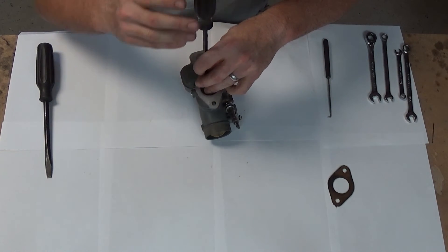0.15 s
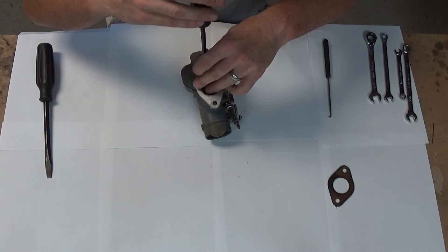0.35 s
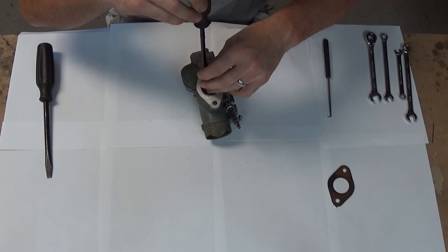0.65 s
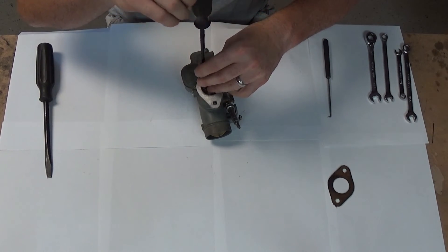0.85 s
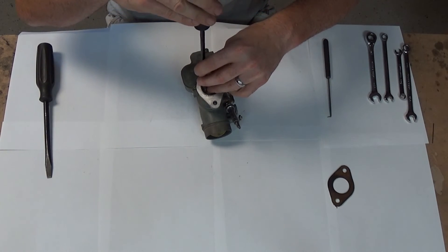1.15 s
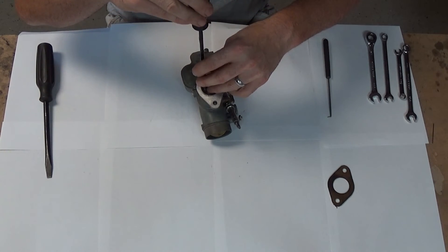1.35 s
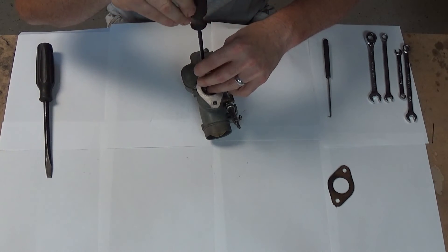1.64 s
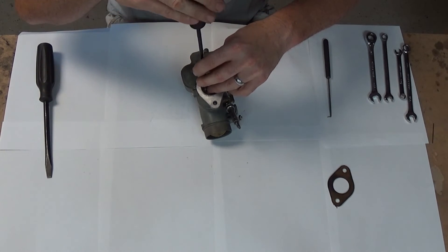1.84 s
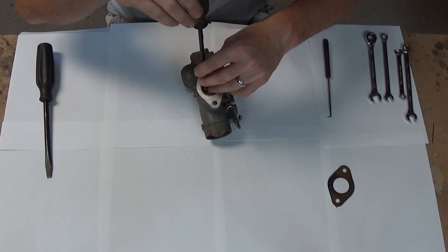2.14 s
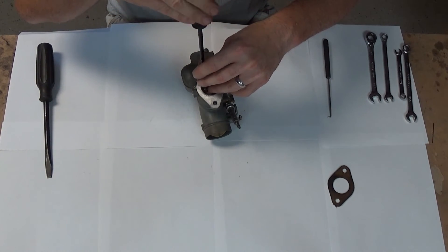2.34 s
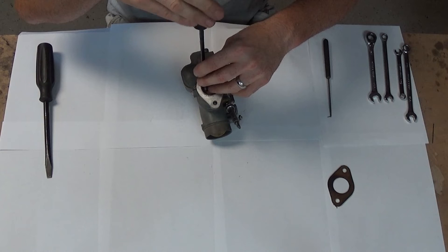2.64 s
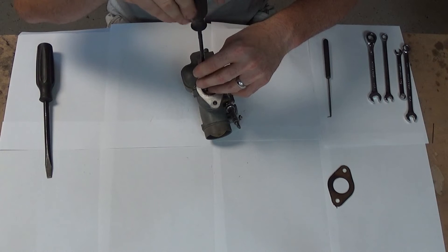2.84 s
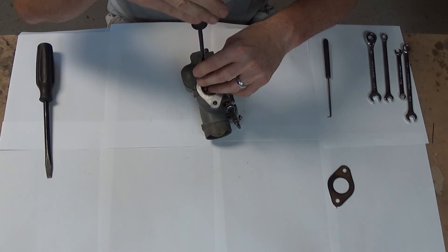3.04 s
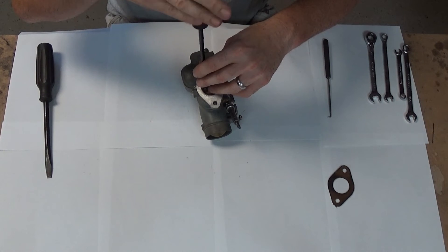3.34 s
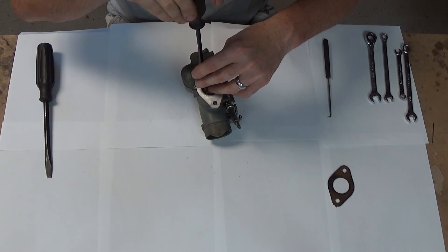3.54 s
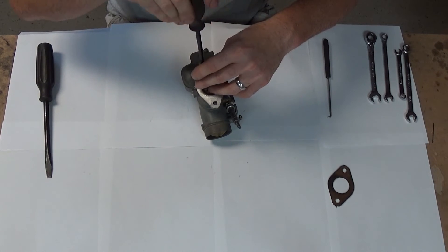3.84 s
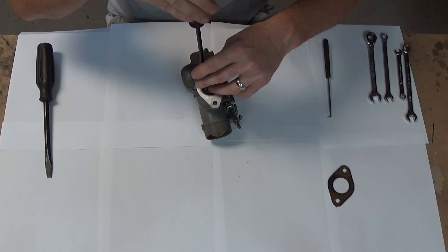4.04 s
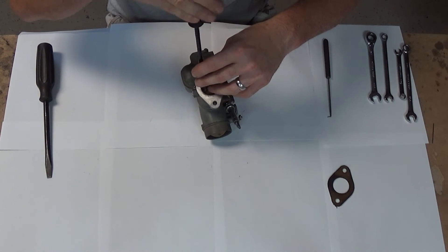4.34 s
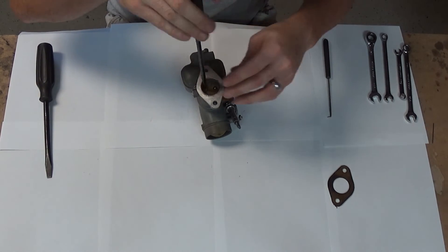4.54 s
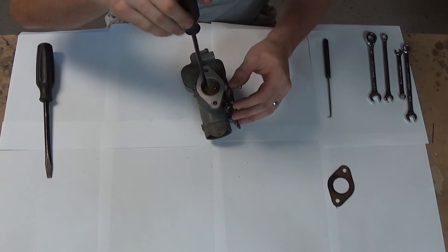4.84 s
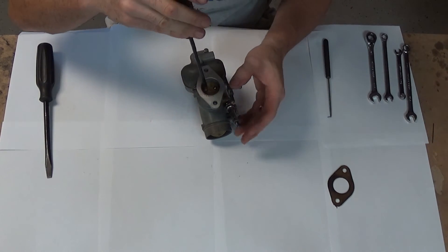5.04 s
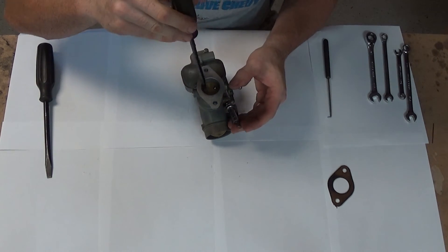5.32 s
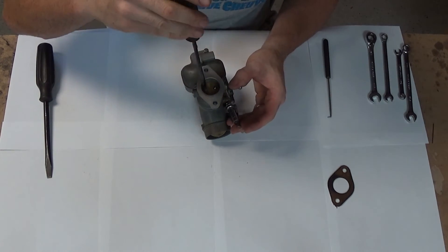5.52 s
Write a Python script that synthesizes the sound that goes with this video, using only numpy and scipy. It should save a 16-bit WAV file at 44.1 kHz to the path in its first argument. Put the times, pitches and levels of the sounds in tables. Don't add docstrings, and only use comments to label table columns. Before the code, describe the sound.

A screwdriver clacks, ticks and rings on a small metal casting over a bench, with one hard snap near the end and a faint hum.

```python
import sys
import numpy as np
from scipy import signal
from scipy.fft import rfft, irfft, next_fast_len
from scipy.io import wavfile
from scipy.ndimage import map_coordinates

SR = 44100
rng = np.random.default_rng(int(sys.argv[2]) if len(sys.argv) > 2 else 0)


def decibels_to_gain(level_db):
    exponent = np.asarray(level_db, float) / 20
    return 10 ** exponent


def put_to_file(sound):
    columns = np.atleast_2d(sound).T
    safe = np.clip(columns, -1, 1)
    whole_steps = np.round(safe * 32767)
    wavfile.write(sys.argv[1], SR, whole_steps.astype(np.int16))


N = 250488

# freq_hz, density_db_per_hz
SHOP = [(15, -14), (25, -15), (54, -3.5), (80, -2), (103, -3.5), (123, 0.5), (145, -13.5), (204, -10.5),
        (319, -14.5), (430, -15), (965, -18), (1060, -19), (1760, -23.5), (2200, -27), (2860, -31),
        (4840, -120)]
# freq_hz, density_db_per_hz
HISS = [(500, -30), (1500, 3), (3000, 3), (6000, -2), (10000, -3.5), (13000, -6), (15000, -7.5),
        (15900, -11), (16050, -60)]
# freq_hz, correlation (0-1)
LIKENESS = [(30, 0.999), (100, 1), (150, .98), (290, 0.72), (640, 0.23), (1400, 0.057), (3000, 0.41),
            (4300, 0.38), (5300, 0.82), (6500, 0.97), (15000, 1)]
# freq_hz, width_hz, level_db
HOUSING = [(2680, 400, -1.5), (3200, 850, -9), (3805, 70, 3.5)]
# freq_hz, width_hz, level_db
PORT_WALL = [(3850, 90, 4), (2900, 820, -7)]
# freq_hz, t60_s
WALLS_T60 = [(120, 0.27), (260, 0.22), (460, 0.53), (2000, 0.37), (6000, 0.29), (11000, 0.22),
             (14800, 0.19), (15600, 0.023)]
# freq_hz, width_hz, level_db
BENCH = [(106, 16, -6.5), (186, 49, -3.5), (272, 33, -1), (415, 14, 8), (503, 81, 3.5)]
# freq_hz, width_hz, level_db
BOARDS = [(593, 62, -0.5), (870, 48, 5), (1010, 37, 6.5), (1140, 320, -4)]
# start_s, peak_db, strongest_hz, upper_modes_db
KNOCKS = [(0.31, -35, 201, -9), (0.4, -36, 195, -8), (0.401, -31, 281, -17), (0.589, -34.5, 410, -11.5),
          (1.212, -36, 139, -7.5), (1.213, -34.5, 360, -23), (1.387, -31.5, 420, -17),
          (1.42, -39.5, 456, -28), (1.542, -33, 238, -2), (2.385, -61, 440, 1), (2.628, -48, 190, 4.5),
          (2.632, -41.5, 473, -9), (2.743, -55, 186, 10), (2.784, -42, 110, -1), (3.15, -39, 415, -7),
          (3.472, -40, 398, -21), (3.619, -43, 436, -9), (3.749, -48, 173, -21), (3.787, -42, 187.2, -25),
          (4.42, -41.5, 416, -28), (4.682, -39, 434, -7), (5.056, -44.5, 190, -5), (5.1982, -25, 439, -7.5)]
# middle_s, half_length_s, level_db
REGRIPS = [(2.023, 0.033, -56), (2.354, .004, -54), (2.4, 0.22, -65), (2.91, 0.054, -56),
           (3.3, 0.039, -55.5), (3.446, 0.013, -57), (3.545, 0.12, -54), (3.867, 0.058, -51.5),
           (4.159, 0.028, -49.5), (4.39, 0.012, -52), (4.51, 0.042, -52.5), (4.814, 0.066, -53.5),
           (5.669, 0.047, -49.5)]
# middle_s, half_length_s, level_db
SLIDES = [(1.042, 0.037, -57.5), (2.568, 0.024, -51), (3.21, 0.036, -53.5), (4.069, 0.015, -48.5),
          (4.206, 0.019, -56), (4.91, .02, -55), (5.012, 0.069, -49.5), (5.14, 0.053, -56),
          (5.31, 0.086, -44), (5.434, 0.095, -52), (5.578, 0.036, -53)]
# start_s, peak_db, loudest_hz, width_hz, other_modes_db
CLACKS = [(0.3117, -22.5, 3260, 196, -19.5), (.323, -34, 3700, 250, -26), (0.385, -30.5, 3200, 300, 0),
          (.4012, -25, 3200, 250, -8), (0.4973, -37, 3200, 250, 3), (0.5926, -33.5, 3230, 119, -18.5),
          (1.2129, -33, 1620, 252, -6), (1.3881, -28, 3200, 250, 1), (1.5382, -39, 3200, 200, -14),
          (1.5438, -21, 3130, 260, -5.5), (1.547, -26, 3160, 200, -4), (1.951, -31.5, 3200, 200, -8),
          (2.385, -41, 1760, 120, -11), (2.565, -42, 2110, 120, -10), (2.629, -32.5, 1580, 300, 0),
          (2.744, -36.5, 2680, 200, -9), (3.1232, -43, 2130, 250, -8), (3.431, -22, 3010, 330, -15),
          (3.433, -31.5, 1760, 159, -34), (3.465, -40, 3150, 150, -10), (3.7489, -35, 2130, 148, -16),
          (3.7543, -30, 3060, 220, -13), (3.984, -41, 3280, 252, -10), (4.06, -31, 3200, 250, -6),
          (4.102, -34.5, 1610, 200, -10), (4.3769, -20, 2800, 457, -16.5), (4.379, -35, 2810, 150, -24),
          (4.4194, -23.5, 3100, 315, -13), (4.6809, -21.5, 2430, 447, -13),
          (4.682, -28.5, 2400, 60.6, -17.5), (4.7304, -24, 1577, 150, 2), (4.9532, -39, 2900, 400, -6),
          (5.0575, -31, 3030, 500, -1), (5.106, -37.5, 1870, 180, -21), (5.5819, -35, 1540, 250, -3),
          (5.6476, -51, 1610, 150, -18)]
# start_s, peak_db, loudest_hz
TAPS = [(0.3107, -29, 5060), (0.3855, -35, 5170), (0.3988, -24.5, 5570), (0.5891, -36.5, 7960),
        (1.544, -29.5, 5700), (2.5621, -37, 5710), (2.7427, -27, 5560), (3.121, -38, 8000),
        (3.1295, -38, 6300), (3.7472, -30.5, 7640), (3.766, -40, 10300), (4.0587, -36, 7790),
        (4.1004, -35, 7040), (4.373, -41, 4510), (4.4179, -34.5, 5650), (4.679, -26.5, 5400),
        (4.7282, -30, 5470), (4.9515, -30.5, 5700), (4.977, -35, 10000), (5.057, -36, 5300),
        (5.1223, -42, 6490), (5.1617, -31, 5270), (5.397, -36, 7000), (5.4026, -29, 6550),
        (5.5802, -30, 5500)]
# start_s, peak_db, then tilt_db at the first three FREE_HZ
SLIPS = [(0.8019, -25.5, -2, 3, 10), (1.9283, -22.5, -4, -3, 2.5), (1.9318, -32, -5, -4, 0),
         (2.786, -20.5, -2, 1, 0), (2.7901, -23, -3, -1.5, -4), (3.149, -32, 2, 2, 1),
         (3.1522, -20.5, -6.5, -1, 1), (3.4708, -23.5, -6, 1, 0), (3.4742, -31, 1, 2, -8),
         (3.7882, -21, -13, -2, 0), (3.7927, -23.5, 4, 6, -7)]
# start_s, peak_db, then tilt_db at the first three BENT_HZ
SNAP = [(5.1977, -1.5, -20, -4, 3), (5.1984, -6.5, -3, 7, 13), (5.1993, -1.5, -11.5, 1, -19),
        (5.2012, -7.5, -2, 12, -5), (5.2032, -12, -6, -5, -16), (5.205, -20, -4, -2, -15)]
# start_s, peak_db, freq_hz, width_hz
RINGS = [(1.2098, -38, 872, 35), (1.388, -40, 851, 50), (1.388, -40, 2200, 82), (1.5445, -31, 3100, 90),
         (1.929, -43, 9200, 22), (1.929, -34.5, 3725, 40), (1.944, -42, 6450, 37), (2.349, -44, 855, 40),
         (2.348, -43, 2000, 200), (2.386, -49, 866, 27), (2.6295, -44, 1020, 90), (2.7438, -34, 890, 47),
         (2.7424, -36, 1140, 120), (2.7864, -26, 5900, 90), (2.786, -43, 5700, 12), (2.745, -42, 2720, 31),
         (1.929, -50, 14320, 30), (3.1, -49, 15000, 32), (3.472, -53, 11200, 15), (3.789, -55, 11200, 13),
         (3.472, -48, 14320, 30), (5.199, -27, 700, 110), (5.1985, -20, 8200, 330), (2.7865, -31, 8790, 44),
         (2.7865, -42, 8786, 13), (1.546, -34, 495, 10), (0.54, -34, 460, 22), (0.94, -41, 280, 22),
         (4.42, -38, 3200, 35), (2.4, -40, 2900, 500), (2.7865, -49, 14320, 24), (2.788, -43, 2100, 70),
         (3.152, -31.5, 3600, 30), (3.151, -34.5, 2260, 74), (3.151, -32, 2700, 300),
         (3.152, -42, 5803, 91), (3.472, -33, 4400, 84), (3.472, -43, 3381, 90), (3.7885, -44, 15000, 26),
         (4.0587, -46, 1100, 80), (4.1005, -42, 910, 35), (5.199, -22.5, 940, 71), (5.199, -32, 4500, 640),
         (5.58, -48, 1070, 120), (5.66, -46, 1630, 33)]
# freq_hz, width_hz, level_db
CASTING = [(1240, 100, -17.5), (1600, 78, -2), (2255, 370, -10.5), (2710, 76, -5), (3150, 54, -5.5),
           (3700, 110, -10.5)]
# freq_hz, width_hz, level_db
TIP = [(5700, 146, 7), (7300, 4000, -5.5), (9450, 98, 2.5), (9870, 1100, -8), (12400, 490, -28)]
# freq_hz, width_hz, level_db
SHAFT = [(2160, 43, -3.5), (3180, 170, 1.5), (3700, 74, -0.5), (4364, 84, -6.5), (5655, 160, 0.5),
         (5810, 110, -8.5), (6440, 81, -4.5), (8000, 59, -7), (8810, 84, -1.5), (9130, 70, 3),
         (10030, 100, -2), (11200, 30, -7), (13450, 100, -5), (14320, 45, -26)]
# freq_hz, width_hz, level_db
BENT = [(1020, 80, -18), (1730, 140, -1), (2130, 79, 2.5), (3150, 180, 3.5), (3630, 100, -2),
        (5630, 170, -1.5), (6060, 200, -1), (7200, 200, 5), (8900, 200, 2.5), (9800, 190, 2.5),
        (10100, 117, 10.5), (10630, 230, 2), (12550, 230, -3), (13100, 270, -4.5)]

FREE_HZ, BENT_HZ = (3200, 3710, 5650, 8800), (3150, 5660, 7160, 10400)
SLIP_S, SNAP_S, TAP_S = 0.0021, 0.00067, 0.0014
LIGHT_DB, LIGHT_HZ, LIGHT_UPPER_DB = -48, 415, -4
HANDLE_HZ, METAL_HZ = 10000, 6900
FRAME_HZ, FIRST_FRAME_S = 29.97, 0.0103
CLIMB_S_PER_HZ, CLIMB_FROM_HZ = 1.7e-6, 2415
ODD_FRAME_DB = 3.5
CEILING, TOP_HZ = 0.96, 16600


def unit(x):
    return x / np.sqrt(np.mean(x ** 2) + 1e-20)


def peak(x):
    return x / np.max(np.abs(x))


def along(points, hz):
    f, v = np.transpose(points)
    return np.interp(np.log(hz + 1), np.log(f + 1), v)


def wobble(rate):
    knots = rng.standard_normal(int(N * rate / SR) + 4)
    return map_coordinates(knots, [np.arange(N) * rate / SR])


def filtered(x, response):
    m = next_fast_len(x.shape[-1] + 8192)
    spectrum = rfft(x, m) * response(np.fft.rfftfreq(m, 1 / SR))
    return irfft(spectrum, m)[..., :x.shape[-1]]


def modal(f, modes):
    total = 0
    for k, (c, w, db) in enumerate(modes):
        damping = 1j * f * abs(w)
        total = total + (-1) ** k * decibels_to_gain(db) * damping / (c * c - f * f + damping)
    return total


def resonant(x, modes):
    return filtered(x, lambda f: modal(f, modes))


def vary(modes, spread_db):
    return [(c, w, db + rng.normal(0, spread_db)) for c, w, db in modes]


def rush(spectrum):
    def shape(hz):
        turn = np.arccos(np.clip(along(LIKENESS, hz), -1, 1)) / 2
        return decibels_to_gain(along(spectrum, hz)) * [np.cos(turn), np.sin(turn)]
    mid, side = filtered(rng.standard_normal((2, N)), shape)
    return unit(np.array([mid + side, mid - side]))


def workshop():
    phase = 2 * np.pi * 119.6 * np.arange(N) / SR + 0.84 * wobble(21)
    hum = decibels_to_gain(-55.0 + 1.7 * wobble(9.2)) * np.sin(phase)
    rumble = decibels_to_gain(-48.0 + 0.18 * wobble(4.5)) * rush(SHOP)
    return hum + rumble + decibels_to_gain(-54.5) * rush(HISS)


def camera():
    frames = np.arange(FIRST_FRAME_S, N / SR - .02, 1 / FRAME_HZ)
    chance = rng.standard_normal((len(frames), 3))
    at = ((frames + .0004 + .00006 * chance[:, 0]) * SR).astype(int)
    force = np.zeros((2, N))
    force[0, at] = decibels_to_gain(1.5 * chance[:, 1] - ODD_FRAME_DB * (-1.) ** np.arange(len(at)))
    force[1, at] = decibels_to_gain(0.6 * chance[:, 2])

    def dispersion(hz):
        above = np.clip(hz - CLIMB_FROM_HZ, 0, None)
        return np.exp(-1j * np.pi * CLIMB_S_PER_HZ * above ** 2) * (hz < 5500)
    force = filtered(force, dispersion)
    both = decibels_to_gain(-59.5) * unit(resonant(force[0], HOUSING[:2]) + resonant(force[1], HOUSING[2:]))
    rocking = decibels_to_gain(-66.5) * unit(resonant(force[1], PORT_WALL))
    return np.array([both + rocking, both - rocking])


def room(x):
    hz, t, z = signal.stft(rng.standard_normal((2, SR // 2)), SR, nperseg=256)
    decay = decibels_to_gain(-60 * t / along(WALLS_T60, hz)[:, None])
    tail = signal.istft(z * decay, SR, nperseg=256)[1]
    apart = [(300, 0.038), (1000, 0.25), (4000, 0.38), (8000, 0.1)]  # freq_hz, side share
    mid, side = tail[0], filtered(tail[1], lambda f: np.clip(along(apart, f), 0, 1))
    pair = np.array([mid + side, mid - side]) / np.linalg.norm(mid)
    delayed = np.pad(x, (200, 0))
    return signal.fftconvolve(delayed[None], pair, axes=1)[:, :N]


def bench():
    out, t = np.zeros(N + SR), np.arange(SR // 4) / SR
    light = [(row[0], LIGHT_DB, LIGHT_HZ, LIGHT_UPPER_DB) for row in CLACKS + SLIPS]
    for s, db, hz, upper_db in KNOCKS + light:
        low = resonant(t * np.exp(-t / 0.00053), vary(BENCH, 0.87) + [(hz, 34, 9)])
        upper = resonant(t * np.exp(-t / 0.00023), vary(BOARDS, 0.53))
        out[round(s * SR):][:len(t)] += decibels_to_gain(db + 2.0) * (peak(low) + decibels_to_gain(upper_db) * peak(upper))
    return out[:N]


def fingers():
    out = np.zeros(N + SR)
    grains = unit(decibels_to_gain(2.3 * wobble(270) + 1.0 * wobble(50)) * rng.standard_normal(N))
    strokes = [(*row, HANDLE_HZ) for row in REGRIPS] + [(*row, METAL_HZ) for row in SLIDES]
    for s, half, db, hz in strokes:
        at = np.arange(round((s - 3 * half) * SR), min(N, round((s + 3 * half) * SR)))
        rub = resonant(grains[at], [(hz, 0.84 * hz, 0)])
        rub = resonant(rub, [(0.12 * hz, 0.34 * hz, 0)])
        out[at] += decibels_to_gain(db) * np.exp(-((at / SR - s) / half) ** 2) * unit(rub)
    return out[:N]


def contacts(blows, length, low_hz):
    out, t = np.zeros((4, N + SR)), np.arange(SR // 8) / SR
    click, u = 1. * (t == 0), t / max(length, 2e-4)

    def edges(f):
        low_cut = (1j * f / (low_hz + 1j * f)) ** 2
        return low_cut / (1 + 1j * f / 14000) ** 2 / (1 + (f / 15700) ** 20)
    for k, (s, db, modes) in enumerate(blows):
        force = u ** 0.25 * np.exp(-u) * rng.standard_normal(len(t)) if length else click
        power = np.abs(rfft(force)) ** 2
        evened = []
        for c, w, level in modes:
            first = max(0, int((c - abs(w) / 2) / 8))
            last = int((c + abs(w) / 2) / 8) + 2
            share = power[first:last].mean() / power.mean()
            evened.append((c, w, level - 10 * np.log10(share)))
        blurred = [(c, 4.0 * w + 0.08 * c, level) for c, w, level in modes]
        both = filtered(np.array([force, click]), lambda f: edges(f) * [modal(f, evened), modal(f, blurred)])
        both[1] *= np.linalg.norm(both[0]) / np.linalg.norm(both[1])
        start = round(s * SR)
        out[[0, 1 + k % 3], start:start + len(t)] += decibels_to_gain(db) * both / np.max(np.abs(both[0]))
    return out[:, :N]


def gripped(rows, modes, marks_hz):
    blows = []
    for s, db, *tilt in rows:
        curve = list(zip(marks_hz, (*tilt, 0)))
        blows.append((s, db, [(c, w, level + along(curve, c)) for c, w, level in vary(modes, 1.3)]))
    return blows


def screwdriver():
    seated = []
    for s, db, hz, w, rest_db in CLACKS:
        pair = [(hz - 0.09 * w, w, 0), (hz + 0.21 * w, w, 0)]
        rest = [(c, v, level + rest_db) for c, v, level in vary(CASTING, 2.4)]
        seated.append((s, db, pair + rest))
    tapped = [(s + .0006, db, vary(TIP, 0.76) + [(hz, 1500, 0), (8000, 5000, -9)]) for s, db, hz in TAPS]
    singing = [(s, db, [(hz, w, 0)]) for s, db, hz, w in RINGS]
    free = SHAFT + [(1630, 170, -4.5), (6300, 7500, -16.5)]
    loaded = BENT + [(15900, 1500, -11), (10000, 8700, -8.5)]
    slips = contacts(gripped(SLIPS, free, FREE_HZ), SLIP_S, low_hz=796)
    snap = contacts(gripped(SNAP, loaded, BENT_HZ), SNAP_S, low_hz=400)
    clean = contacts(seated + singing, 0, low_hz=795)
    return clean + decibels_to_gain(-2.0) * contacts(tapped, TAP_S, low_hz=2500) + slips + snap


def scene():
    (facing, *around), boom = screwdriver(), bench()

    def port_difference(hz):
        return 1j * hz / (2000 + 1j * hz) * np.exp(-2j * np.pi * hz * 0.00026)
    unlike = decibels_to_gain(-20.5) * filtered(facing, port_difference)
    echo = room(0.36 * facing + 1.48 * boom) + 0.38 * sum(room(lane) for lane in around)
    hands = filtered(fingers(), lambda hz: hz < 15900)
    direct = facing + boom + unlike * [[1], [-1]] + hands
    return direct + decibels_to_gain(-5.5) * echo + workshop() + camera()


def band_limit(x):
    return signal.sosfilt(signal.butter(12, 16850, fs=SR, output="sos"), x)


def record(dry):
    held = dry / (1 + np.abs(dry / CEILING) ** 6) ** (1 / 6)
    mix = filtered(held, lambda hz: hz < TOP_HZ)
    return band_limit(mix)


dry = scene()
out = record(dry)
put_to_file(out)
```